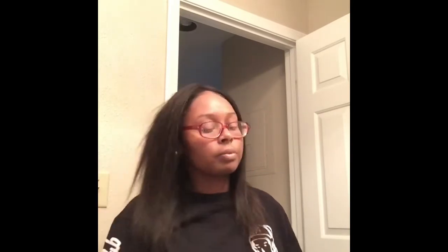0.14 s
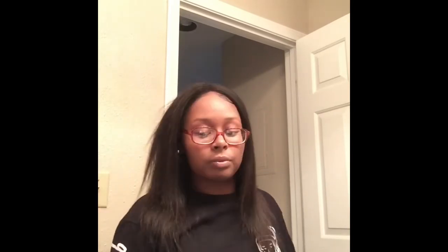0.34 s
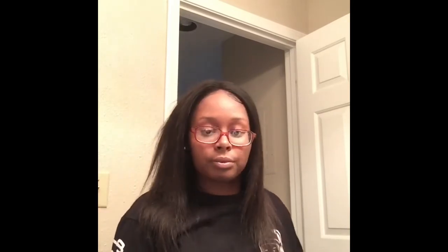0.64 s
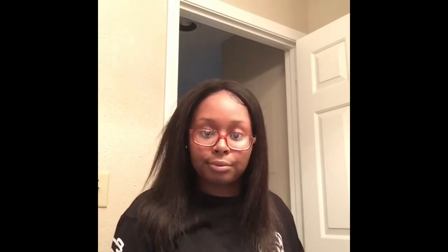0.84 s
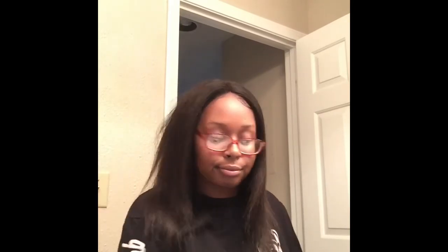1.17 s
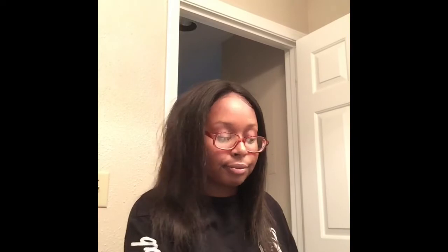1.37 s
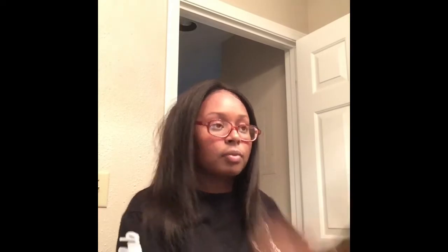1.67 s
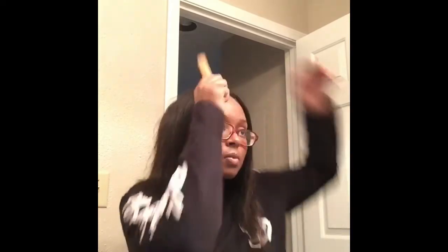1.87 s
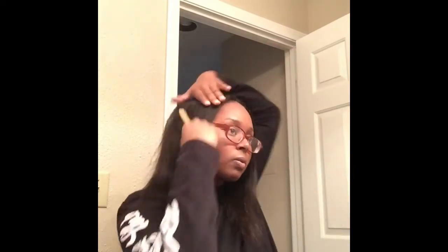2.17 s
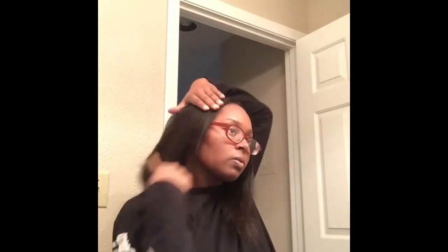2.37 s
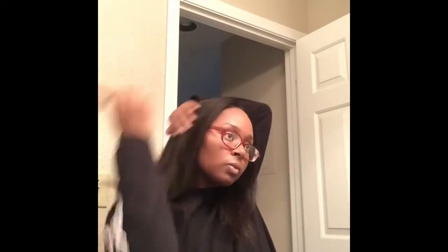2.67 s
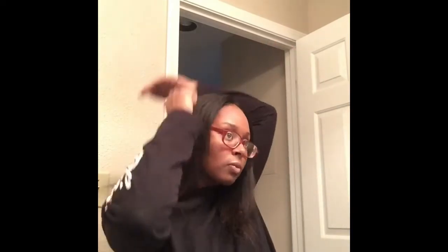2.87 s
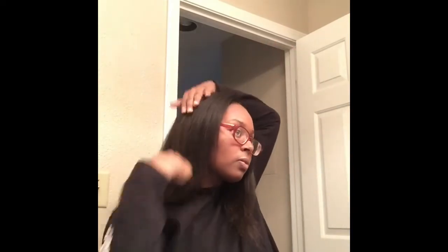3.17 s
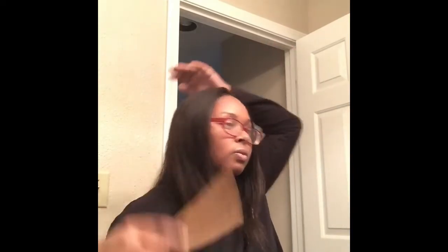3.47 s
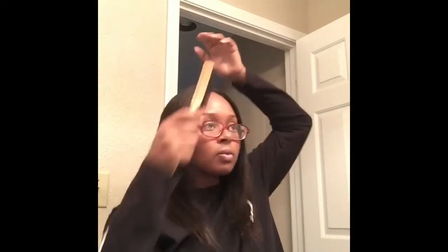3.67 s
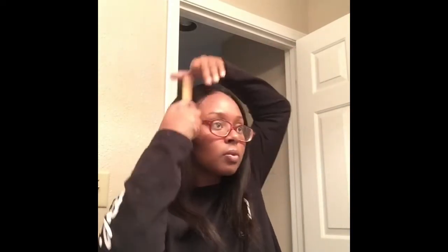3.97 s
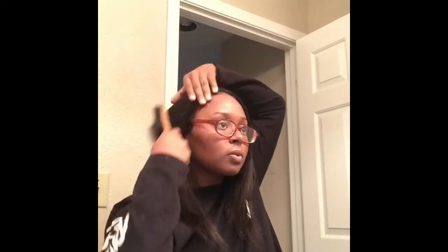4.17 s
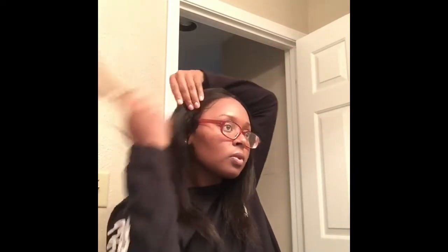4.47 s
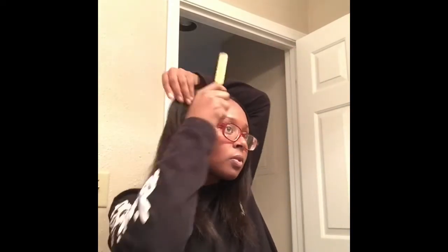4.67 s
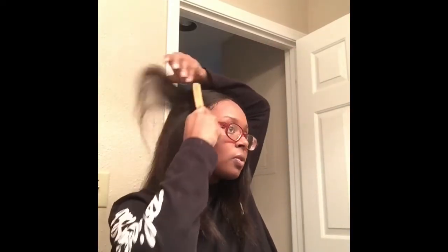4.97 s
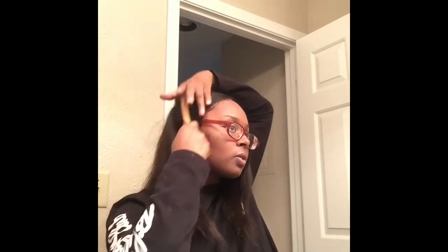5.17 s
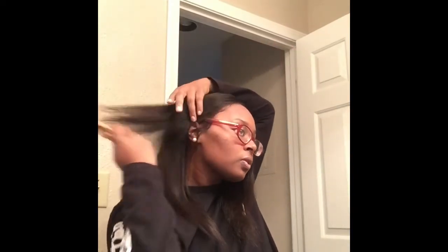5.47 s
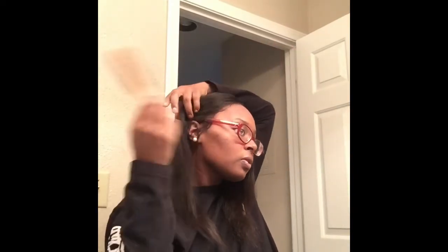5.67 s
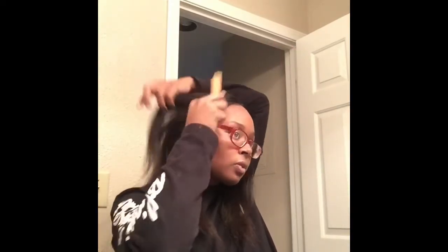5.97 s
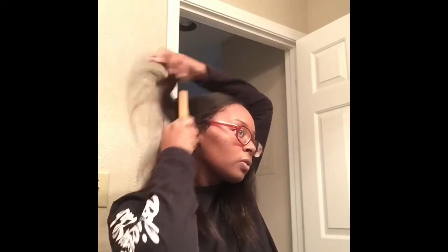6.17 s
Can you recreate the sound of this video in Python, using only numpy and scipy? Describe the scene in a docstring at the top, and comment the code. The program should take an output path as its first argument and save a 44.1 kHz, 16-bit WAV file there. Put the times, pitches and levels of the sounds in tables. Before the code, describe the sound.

Close up in a tiled bathroom: at once a bright plastic clack, small ticks and faint sliding scrapes, then a hard knock on a hollow counter about a second in. After a light comb click, hair is combed in five separated hissing swishes, uneven and papery, with occasional little snags. Sleeves brush faintly between. A steady low fan hum with soft air lies underneath.

```python
"""In a small tiled bathroom a plastic brush clatters, slides and is put down on the counter with a hollow knock.
A comb is picked up with a click and drawn through long hair in five soft strokes; sleeves rustle faintly.
A ventilation fan rumbles and hums throughout. Contacts are noise bursts ringing decaying modes,
rubbing is a rain of random impulses, hair and fan are filtered noise, and the tiles add a dense tail."""
import sys
import numpy as np
from scipy import signal
from scipy.fft import rfft, irfft
from scipy.io import wavfile

SR = 44100
rng = np.random.default_rng(int(sys.argv[2]) if len(sys.argv) > 2 else 0)


def dump(signal):
    """Clip the signal to [-1, 1] and save it as 16-bit WAV at the path in sys.argv[1]."""
    limited = np.clip(np.atleast_2d(signal).T, -1, 1)
    pcm = np.round(limited * 32767).astype(np.int16)
    wavfile.write(sys.argv[1], SR, pcm)


N = 279223
T = np.arange(N) / SR
HZ = np.maximum(np.arange(N // 2 + 1) * SR / N, 1)
RING = T[:SR // 2]  # time axis of every impulse response, s

# Handle clacks. Each row: start in seconds, level in dB, brightness in Hz, contact length in seconds.
CLACKS = [(.0045, -32, 14100, 0.0063), (.022, -43.5, 5000, 0.0071), (.121, -44.5, 4500, 0.0095),
          (.163, -52, 2440, 0.0014), (.742, -52, 6300, 0.0086), (.766, -48.5, 2310, 0.014)]
# Handle spectrum. Each row: frequency in Hz, gain in dB.
HANDLE_SPECTRUM = [(160, -2.5), (300, -9.5), (500, -13), (800, -13.5), (1000, -10), (1400, -9.5),
                   (1650, -4), (2200, -5), (2500, -9.5), (2900, -8), (3700, -9), (6500, -15), (9000, -19.5),
                   (14000, -22)]
# Handle modes. Each row: frequency in Hz, relative level in dB, t60 in seconds.
HANDLE_MODES = [(1665, 0, .09), (2130, -2, .07), (2812, -3, .16), (2990, -5, .16), (3260, -6, .16),
                (3492, -6, .16), (4584, -9, .16)]
# Landing and chatter. Each row: start in seconds, level in dB, brightness in Hz, contact length in seconds.
KNOCKS = [(0.937, -43, 2520, 0.00069), (1.057, -45, 2200, 0.0022), (1.0982, -30.5, 10200, 0.0016),
          (1.1113, -45.5, 15000, 0.002), (1.133, -45.5, 600, .004), (1.432, -51.5, 1000, 0.06)]
# Landing crack spectrum. Each row: frequency in Hz, gain in dB.
CRACK_SPECTRUM = [(550, 3), (810, -4.5), (1000, -5.5), (1350, -3.5), (1720, 0.5), (2200, -10), (2900, -6.5),
                  (4500, -12), (6750, -7), (7150, -0.5), (7600, -11), (8800, -3), (10700, -11), (12000, -2),
                  (15600, -4.5)]
# Landing crack modes. Each row: frequency in Hz, relative level in dB, t60 in seconds.
CRACK_MODES = [(1750, -12, .04), (7330, 41, 0.062), (7500, 19, 0.056), (8800, -14, .1)]
# Bristle resonances. Each row: frequency in Hz, width in Hz, gain in dB over a flat path.
BRISTLES = [(1170, 410, 21), (3740, 400, 19.5), (6200, 430, -8), (9000, 840, -12)]
# Handle slides. Each row: start in seconds, hold in seconds, friction level in dB.
SLIDES = [(0, 0.0049, -42), (.2, 0.3, -78), (.497, .1, -70), (.655, 0.026, -76)]
# Bristle scrapes. Each row: start in seconds, hold in seconds, level in dB.
SCRAPES = [(.1, 0.19, -71.5), (.942, 0.042, -58), (1.09, 0.018, -56)]


def brush():
    """The brush clacks, slides with its handle ringing, scrapes its bristles and lands."""
    clacks = hits(CLACKS, HANDLE_SPECTRUM, HANDLE_MODES, ring_db=-8)
    landing = hits(KNOCKS, CRACK_SPECTRUM, CRACK_MODES, ring_db=-13)

    slide_spectrum = shape([(700, -14), (1500, -5), (2900, -12.5), (4000, -22), (9000, -27)])
    friction = colour(slips(rate_per_s=2400, spread_db=0.5), slide_spectrum)
    handle_ring = convolve(friction, ring(HANDLE_MODES))
    slide = level(friction) + level(handle_ring, db=-10)

    scrape_spectrum = shape([(900, -9), (3000, -13), (6000, 6), (15500, 8)]) * peaks(BRISTLES)
    scrape = level(colour(slips(rate_per_s=5900, spread_db=10), scrape_spectrum))
    return clacks + landing + slide * rubs(SLIDES) + scrape * rubs(SCRAPES)


RUB_ATTACK_S, RUB_RELEASE_DB_PER_S = 0.002, 163  # moves at once, coasts to a stop


def rubs(rows):
    """Gain over time of the brush's short rubbing movements."""
    return sum(undb(db) * swell(s, RUB_ATTACK_S, hold_s, RUB_RELEASE_DB_PER_S) for s, hold_s, db in rows)


# Sharp hard-plastic ticks. Each row: start in seconds, level in dB, brightness in Hz, contact length in seconds.
TICKS = [(.305, -42.5, 14100, 0.0039), (.329, -55, 12000, 0.011), (.386, -54, 10700, 0.0028),
         (.406, -55, 10300, 0.0025), (.962, -51.5, 14700, 0.00099), (3.997, -64, 10200, 0.0014)]
# Tick spectrum. Each row: frequency in Hz, gain in dB.
TICK_SPECTRUM = [(1000, -19), (2100, -7), (2400, -7), (3000, -7), (4500, -6), (5200, -9.5), (7000, -7),
                 (7700, -0.5), (9600, -0.5), (10400, -13), (12100, -1.5), (14200, -15), (15200, -0.5)]
# Tick modes. Each row: frequency in Hz, relative level in dB, t60 in seconds.
TICK_MODES = [(8000, 0.33, 0.046), (9000, 1, .15)]


def plastic_ticks():
    """Small sharp contacts of hard plastic, the last from the comb, with a faint high ring."""
    return hits(TICKS, TICK_SPECTRUM, TICK_MODES, ring_db=-35)


# Hollow counter modes. Each row: frequency in Hz, relative level in dB, t60 in seconds.
COUNTER_MODES = [(67, -15.5, 0.26), (132, 2, 0.07), (183.5, -1, 0.16), (233.4, -12, 0.4),
                 (259.6, -4, 0.076), (305.8, -7, 0.26), (372, -9, 0.095), (451, -15.5, 0.23),
                 (510, -22, 0.29), (579, -21, 0.15), (710, -44, 0.24), (774, -28, 0.19), (806, -20, 0.082)]
THUD_DB = 12.5  # boom gain, added to the contact level


def counter(give_s=0.00078):
    """Each knock sets the hollow counter's modes booming; the panel takes a moment to give."""
    out = np.zeros(N)
    boom = ring(COUNTER_MODES) * (1 - np.exp(-RING / give_s))
    for s, db, *_ in KNOCKS:
        add(out, s, undb(db + THUD_DB) * boom)
    return out


# Comb pick-up. Each row: start in seconds, level in dB, brightness in Hz, contact length in seconds.
PICKUP = [(1.4912, -44, 12000, 0.0041)]
# Comb body spectrum. Each row: frequency in Hz, relative density in dB per Hz.
COMB_SPECTRUM = [(350, -63), (600, -21), (765, -9), (923, -15), (1210, -3), (1540, -18), (2160, -11.5),
                 (2940, -18), (3460, -11.5), (3950, -18.5), (5460, -13.5), (8640, -21), (15000, -32)]
# Comb body modes. Each row: frequency in Hz, relative level in dB, t60 in seconds.
COMB_MODES = [(775, -11, .18), (1168, -7, .25), (1227, -1, .16), (1857, -6, .16), (2121, -1, .2),
              (2350, -6, .3), (2692, -2, .14), (3467, 0, .25), (4533, -3, .14), (6094, -5, .15)]


def comb_pickup():
    """One contact clicks the comb's body, which rings in its modes."""
    return hits(PICKUP, COMB_SPECTRUM, COMB_MODES, ring_db=-6)


# Five strokes; the second bites twice and takes two rows. Each row: start in seconds, attack in seconds,
# bite hold in seconds, bite level in dB, length before release in seconds,
# glide level before thinning in dB, depth from 0 (tooth tips) to 1 (whole teeth).
STROKES = [(1.963, 0.13, 0.13, -55.5, 0.58, -59, 0.3), (2.949, 0.037, 0.028, -47.5, 0.11, -51.5, 0.44),
           (3.067, 0.065, 0.014, -48.5, 0.37, -63.5, 0.3), (3.93, 0.1, 0.13, -66.5, 0.42, -66, 0.3),
           (4.845, 0.077, 0.334, -62, 0.6, -62.5, 0), (6.044, 0.1, 0.1, -60.5, .35, -61, .3)]
# Hair friction spectrum. Each row: frequency in Hz, gain in dB.
HAIR_SPECTRUM = [(2000, -12.5), (3000, -16), (3600, -10.5), (4400, -8), (6300, -4), (8000, -4), (10300, -2),
                 (12000, 2), (14500, 0), (15700, -2.5)]
# Whole-tooth resonances. Each row: frequency in Hz, width in Hz, gain in dB over a flat path.
TEETH = [(3620, 380, 6.5), (6140, 900, -21), (9050, 780, 5)]
# Tooth-tip resonances. Each row: frequency in Hz, width in Hz, gain in dB over a flat path.
TIPS = [(4830, 590, -6.5), (6060, 180, -5), (7150, 380, -12)]
# Tangle snags. Each row: start in seconds, level in dB, brightness in Hz, contact length in seconds.
SNAGS = [(2.003, -56.5, 6000, 0.012), (2.176, -54, 12000, 0.0056), (2.296, -51.5, 7000, 0.02),
         (3.335, -55, 6000, 0.026), (4.17, -62, 8000, .006), (5.2, -56.5, 11000, 0.0089)]


def comb(flutter_db=1, crackle_db=-7):
    """So many hairs slip off the ringing teeth that they merge into a swish; now and then a tangle snaps free."""
    friction = rng.standard_normal(N) + level(slips(rate_per_s=1200, spread_db=4), crackle_db)
    deep = level(colour(friction, shape(HAIR_SPECTRUM) * peaks(TEETH)))
    shallow = level(colour(friction, shape(HAIR_SPECTRUM) * peaks(TIPS)))
    swish = 0
    for *movement, depth in STROKES:
        swish = swish + stroke(*movement) * (depth * deep + (1 - depth) * shallow)
    locks = undb(flutter_db * wander(rate_hz=9.1))  # the hair passes in uneven locks

    # a freed tooth twangs: resonance width sets its t60
    plucked = [(hz, db, np.log(1000) / (np.pi * width_hz)) for hz, width_hz, db in TEETH + TIPS]
    return swish * locks + hits(SNAGS, HAIR_SPECTRUM, plucked, ring_db=-12.5)


# the hair thins towards its ends, then slips off the comb
GLIDE_FADE_DB_PER_S, STROKE_RELEASE_DB_PER_S = 13.5, 210


def stroke(s, attack_s, bite_s, bite_db, length_s, glide_db):
    """Gain of one stroke: a bite near the scalp, or the glide down thinning hair where that is stronger."""
    bite = undb(bite_db) * swell(s, attack_s, bite_s, STROKE_RELEASE_DB_PER_S)
    thinning = undb(glide_db - GLIDE_FADE_DB_PER_S * np.maximum(T - s, 0))
    glide = thinning * swell(s, attack_s, length_s - attack_s, STROKE_RELEASE_DB_PER_S)
    return np.maximum(bite, glide)


# Sleeve rustles. Each row: start in seconds, length before release in seconds, level in dB.
SLEEVES = [(1.72, 0.22, -68), (2.6, 0.19, -73.5)]
SLEEVE_ATTACK_S, SLEEVE_RELEASE_DB_PER_S = 0.13, 80


def sleeves():
    """Sleeves brush faintly past the hair as the arms come up: dense slips in the hair's spectrum."""
    rustle = level(colour(slips(rate_per_s=5500, spread_db=3), shape(HAIR_SPECTRUM)))
    gain = 0
    for s, length_s, db in SLEEVES:
        gain = gain + undb(db) * swell(s, SLEEVE_ATTACK_S, length_s - SLEEVE_ATTACK_S, SLEEVE_RELEASE_DB_PER_S)
    return rustle * gain


# Duct rumble spectrum. Each row: frequency in Hz, relative density in dB per Hz.
RUMBLE_SPECTRUM = [(20, -41), (30, -14), (50, -13), (70, -4.5), (95, -1.5), (125, 1), (155, -1.5),
                   (190, 0.5), (240, -4), (265, -14), (300, -12.5), (375, -16), (400, -26.5), (520, -33.5)]
# Airy hiss spectrum. Each row: frequency in Hz, relative density in dB per Hz.
AIR_SPECTRUM = [(450, 4.5), (600, 0), (840, 1.5), (930, -1.5), (1000, 3), (1200, -2), (2100, -9.5),
                (3000, -11.5), (4900, -15), (15700, -16)]
# Hum tones. Each row: frequency in Hz, width in Hz, level in dB.
HUM = [(38.9, 2.7, -84.5), (59.6, 3.6, -93), (77.8, 3.6, -73.5), (96, 6.1, -60), (123.9, 7.7, -60),
       (137.85, 1.44, -58.5), (169.8, 6.3, -59.5), (177.7, 2.7, -66), (226.8, 6.5, -63), (247.6, 5, -65.5),
       (363.9, 8.5, -69), (433.2, 9.2, -77)]
RUMBLE_DB, AIR_DB = -49, -68.5


def fan(waver_db=0.8):
    """Turbulent duct rumble, hum tones of narrow noise that waver, and a smooth airy hiss."""
    rumble = level(colour(rng.standard_normal(N), shape(RUMBLE_SPECTRUM)), RUMBLE_DB)
    hum = 0
    for hz, width_hz, db in HUM:
        band = np.exp(-((HZ - hz) / width_hz) ** 2)
        hum = hum + level(colour(rng.standard_normal(N), band), db)
    air = level(colour(rng.standard_normal(N), shape(AIR_SPECTRUM)), AIR_DB)
    return rumble + hum + air * undb(waver_db * wander(rate_hz=5.4))


# Room decay. Each row: frequency in Hz, t60 in seconds.
ROOM_T60 = [(200, 0.53), (1500, 0.24), (5000, 0.25), (15000, 0.2)]


def bathroom(x, wet_db, build_s):
    """Direct sound plus a dense noise tail from close tiled walls; the bass lasts longest."""
    hz, t60_s = np.transpose(ROOM_T60)
    noise, tail = rng.standard_normal(N), 0
    for weights, seconds in zip(np.eye(len(hz)), t60_s):
        band = colour(noise, np.interp(np.log(HZ), np.log(hz), weights))[:len(RING)]
        tail = tail + band * np.exp(-np.log(1000) * RING / seconds)
    tail = unit(tail * (1 - np.exp(-RING / build_s)))
    return x + undb(wet_db) * convolve(x, tail)


HIT_WINDOW_S = 0.01  # contact level is its rms over this time, before softening


def hits(rows, spectrum, modes, ring_db):
    """Each contact is a short gritty push, low-passed at its brightness, into a body with ringing modes."""
    force = np.zeros(N)
    for s, db, bright_hz, contact_s in rows:
        grit = rfft(rng.standard_normal(len(RING)) * np.exp(-RING / contact_s))
        even = irfft(grit / np.abs(grit), len(RING))  # flat spectrum
        push = unit(even * np.exp(-RING / (4 * contact_s)))
        soften = signal.butter(2, min(bright_hz, .45 * SR), fs=SR, output="sos")
        add(force, s, signal.sosfilt(soften, push) * undb(db) * np.sqrt(HIT_WINDOW_S * SR))
    body = response(shape(spectrum)) + undb(ring_db) * unit(ring(modes))
    return convolve(force, body)


def slips(rate_per_s, spread_db):
    """A dense rain of tiny stick-slip releases of uneven size."""
    releases = rng.random(N) < rate_per_s / SR
    return releases * rng.standard_normal(N) * undb(spread_db * rng.standard_normal(N))


def ring(modes):
    """Decaying modes; neighbours swing in opposite directions."""
    out = 0
    for k, (hz, db, t60_s) in enumerate(modes):
        decay = np.exp(-np.log(1000) * RING / t60_s)
        out = out + (-1) ** k * undb(db) * np.sin(2 * np.pi * hz * RING) * decay
    return out


def swell(start_s, attack_s, hold_s, release_db_per_s):
    """Gain over time of one movement: a steady rise, a hold and an exponential release."""
    rise = np.clip((T - start_s) / attack_s, 0, 1)
    return rise * undb(-release_db_per_s * np.maximum(T - start_s - attack_s - hold_s, 0))


def wander(rate_hz):
    """Smooth random motion with a spread of 1."""
    return level(colour(rng.standard_normal(N), np.exp(-(HZ / rate_hz) ** 2)))


def shape(points):
    """Gain at every frequency from (Hz, dB) points, falling 18 dB per octave for 4 octaves beyond the ends."""
    hz, db = np.transpose(points)
    octaves_outside = np.abs(np.log2(HZ / np.clip(HZ, hz[0], hz[-1])))
    return undb(np.interp(np.log(HZ), np.log(hz), db) - 18 * np.minimum(octaves_outside, 4))


def peaks(resonances):
    """Gain at every frequency of a flat path plus (Hz, width in Hz, dB) resonances."""
    return 1 + sum(undb(db) / (1 + (2 * (HZ - hz) / width_hz) ** 2) for hz, width_hz, db in resonances)


def response(gain):
    """Causal unit-energy impulse response with the given gain shape, from its cepstrum."""
    cepstrum = irfft(np.log(gain), N)
    cepstrum[1:N // 2] *= 2
    cepstrum[N // 2:] = 0
    return unit(irfft(np.exp(rfft(cepstrum)), N)[:len(RING)])


def colour(x, gain):
    """Filter by a gain at every frequency."""
    return irfft(rfft(x, N) * gain, N)


def convolve(x, ir):
    """Play a signal through an impulse response."""
    return signal.fftconvolve(x, ir)[:N]


def add(out, s, x):
    """Mix a short sound in at a time in seconds."""
    i = max(int(s * SR), 0)
    out[i:i + len(x)] += x[:N - i]


def undb(db):
    """Decibels to gain."""
    return 10 ** (np.asarray(db) / 20)


def level(x, db=0):
    """Scale to an rms level in dB."""
    return x * undb(db) / np.std(x)


def unit(x):
    """Scale to unit energy."""
    return x / np.sqrt(np.sum(x ** 2))


def scene():
    """Brush, ticks, counter, comb and sleeves sound in the bathroom over the fan."""
    handling = bathroom(brush() + plastic_ticks() + comb_pickup(), wet_db=3.5, build_s=0.001)
    boom = bathroom(counter(), wet_db=-8.5, build_s=0.0066)
    combing = bathroom(comb() + sleeves(), wet_db=-10, build_s=0.0027)
    return (handling + boom + combing + fan())[None]


TOP_HZ = 15750


def record(dry):
    """A steep elliptic low-pass cuts the top of the treble."""
    return signal.sosfilt(signal.ellip(12, .1, 70, TOP_HZ, fs=SR, output="sos"), dry)


dry = scene()
out = record(dry)
dump(out)
```